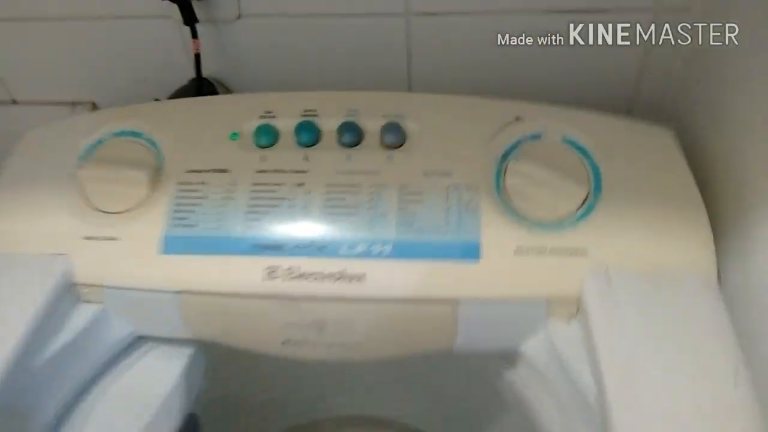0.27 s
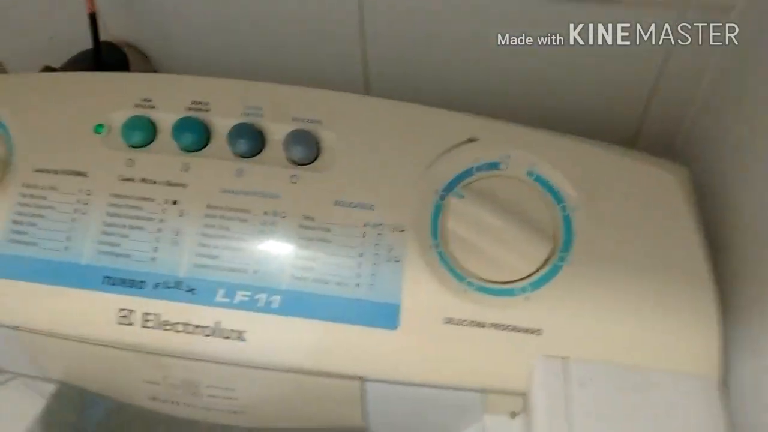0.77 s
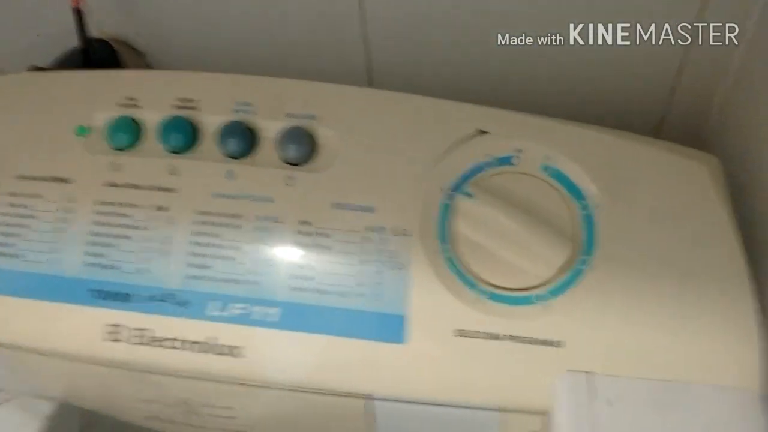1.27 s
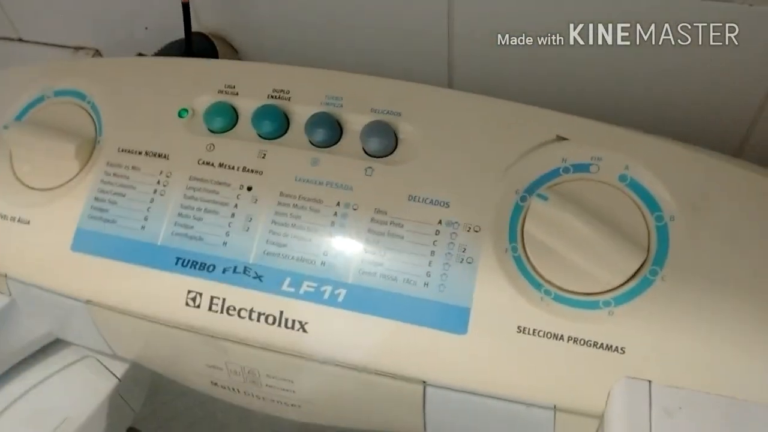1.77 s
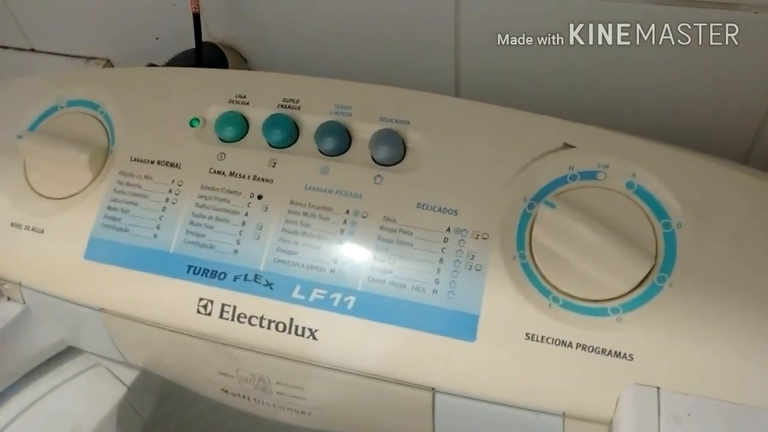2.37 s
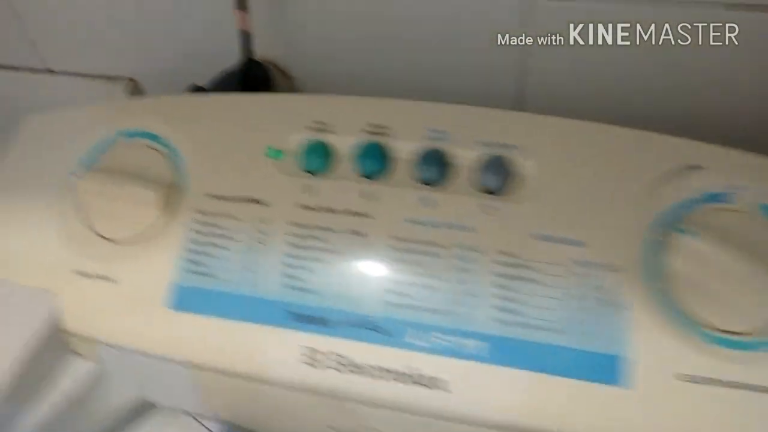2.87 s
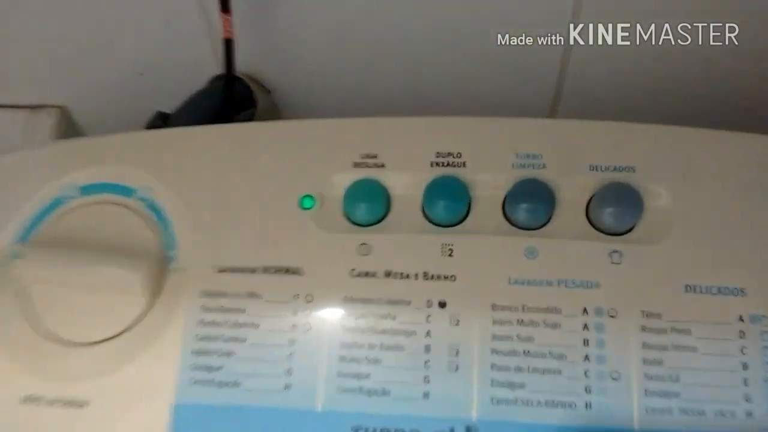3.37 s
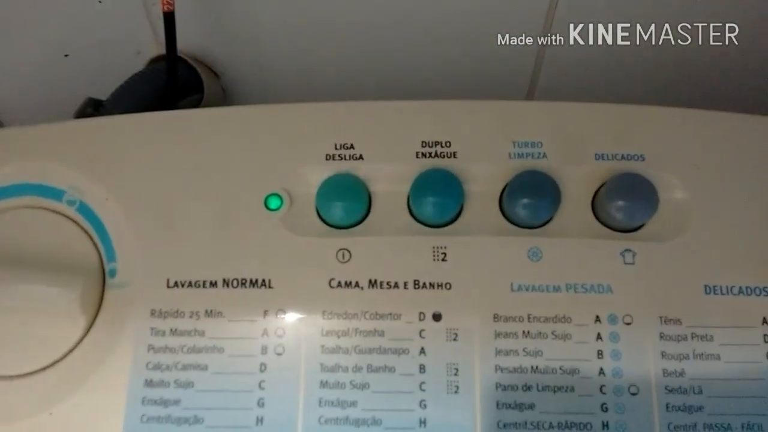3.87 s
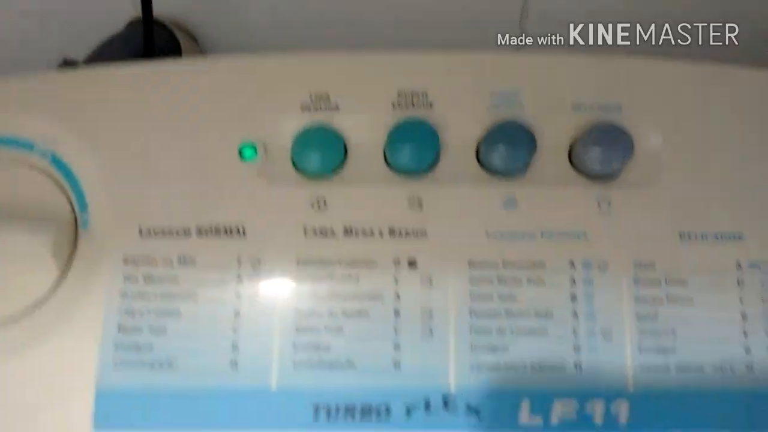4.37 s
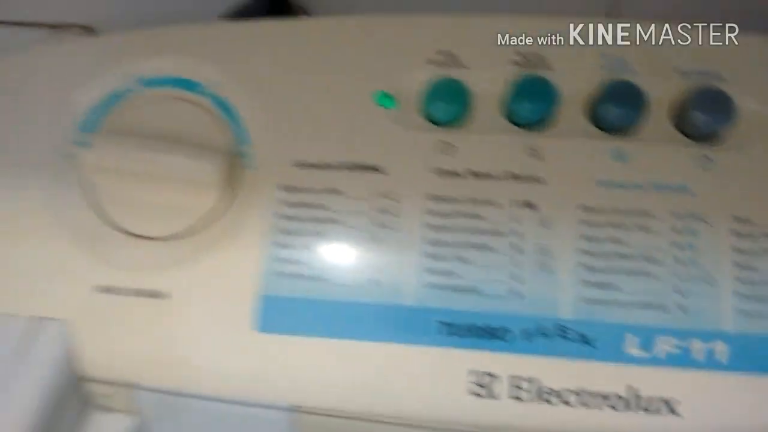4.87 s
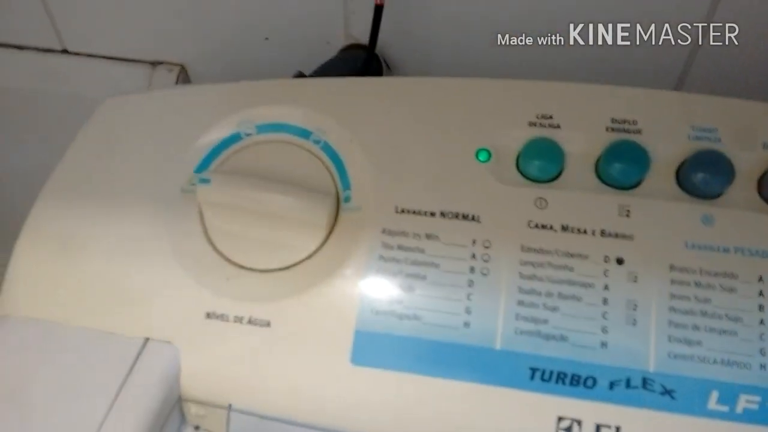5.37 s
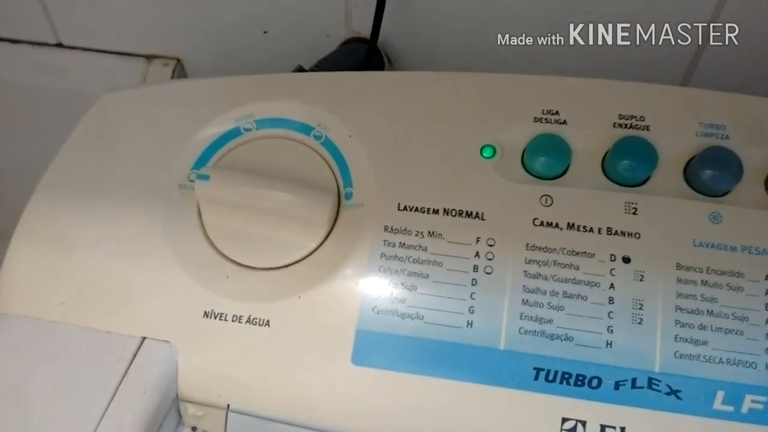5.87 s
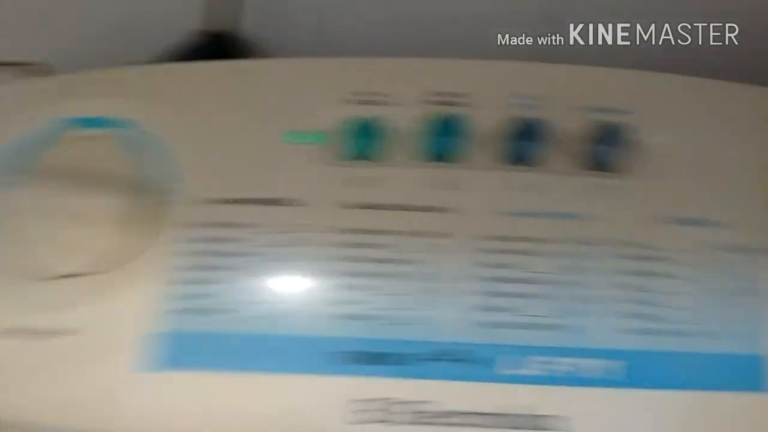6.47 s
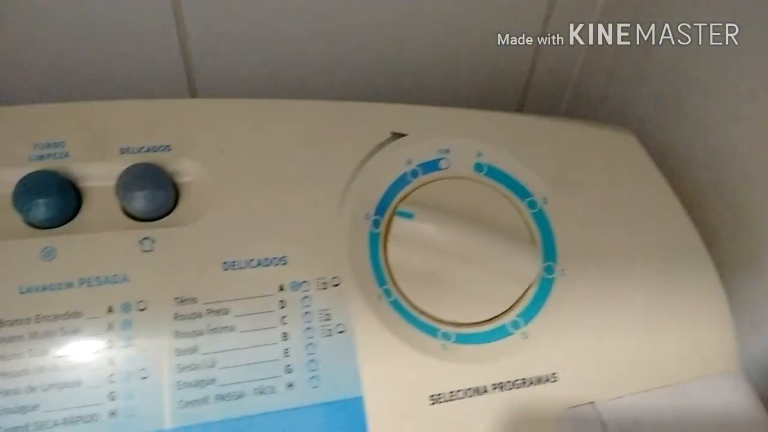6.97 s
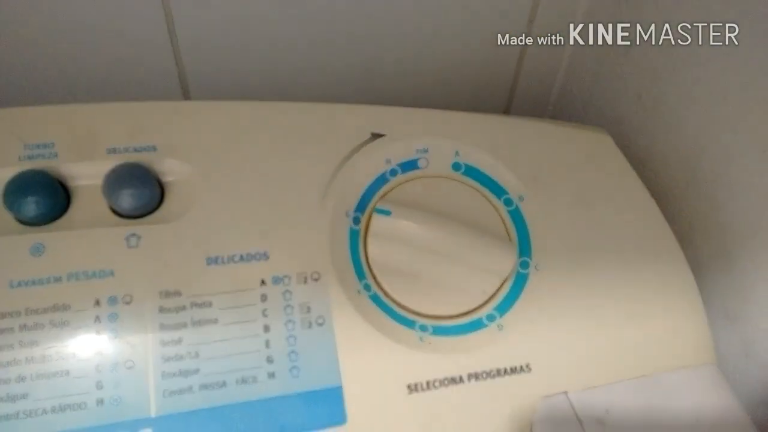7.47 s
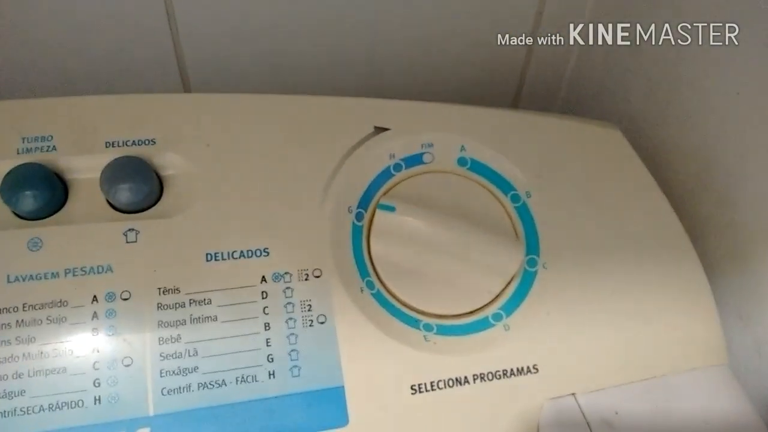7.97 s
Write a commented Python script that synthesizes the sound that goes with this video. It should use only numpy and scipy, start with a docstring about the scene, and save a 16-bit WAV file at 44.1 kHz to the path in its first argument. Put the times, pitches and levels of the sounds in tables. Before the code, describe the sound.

Constant low-mid washer hum with buzzing cabinet rattle and soft spray hiss, its tone shifting as the microphone moves close along the panel.

```python
"""Washing machine on spin

A top-loading machine spins steadily in a small tiled room, heard by a hand-held pair of microphones.
Hum is a sum of mains harmonics, knocks excite wall modes once a cycle, and whir and spray are shaped noise.
Resonators driven by noise give the air spaces, room modes, booms and sizzles; echoes comb the spray.
As the microphones move along the panel, tones and resonances swell and shift; ticks and hiss lie on top."""
import sys
import numpy as np
from scipy import signal
from scipy.fft import rfft, irfft
from scipy.io import wavfile

SR = 44100
rng = np.random.default_rng(int(sys.argv[2]) if len(sys.argv) > 2 else 0)


def pcm_store(signal):
    """Save signal as 16-bit PCM."""
    levels = np.round(np.clip(np.atleast_2d(signal), -1, 1) * 32767)
    wavfile.write(sys.argv[1], SR, levels.astype(np.int16).T)


N = 362502
T = np.arange(N) / SR  # s
HZ = np.fft.rfftfreq(N, 1 / SR)
MAINS_HZ = 59.98


def amp(db):
    """Decibel law: a level in dB becomes an amplitude ratio."""
    return 10 ** (np.asarray(db) / 20)


def unit(x):
    """Normalization: scales a signal to rms 1."""
    return x / np.sqrt(np.mean(x ** 2) + 1e-20)


def colour(rows, axis=1):
    """Spectral envelope: one column of a table, interpolated over log frequency."""
    rows = np.asarray(rows)
    return np.interp(np.log(HZ + 1), np.log(rows[:, 0] + 1), rows[:, axis])


def drift(rate_hz):
    """Low-pass random modulation of rms 1, weakening above rate_hz."""
    size = 2048
    hz = np.fft.rfftfreq(size, T[-1] / size)
    lowpass = 1 / np.sqrt(1 + (hz / rate_hz) ** 4)
    slow = irfft(rfft(rng.standard_normal(size)) * lowpass)
    return np.interp(T, np.linspace(0, T[-1], size), unit(slow))


def bump(s, length):
    """Gaussian envelope of height 1 centred on s."""
    return np.exp(-(2 * (T - s) / length) ** 2)


def swells(rows):
    """Superposed Gaussian changes of level, in dB at every sample."""
    return sum(db * bump(s, length) for s, db, length in rows)


# the two microphones: (f/Hz, likeness 0-1, left minus right/dB, left leads beyond its delay/rad)
MICROPHONES = [(45, 0.3, 5.5, 0.2), (128, 0.25, 0.5, 1.12), (182, 0.6, -2.5, -0.2), (218, 1, 5, -0.77),
               (259, 0.65, 5.5, 0.024), (306, 0.7, 18, 0.62), (350, .9, 7, -0.09), (408, 0.7, 5, -0.47),
               (483, 0.62, 2, 0.65), (587, 0.98, 2.5, 0.16), (754, 0.74, -2, -0.23), (900, 0.74, 0.5, 0.41),
               (1110, 1, 0.5, 0), (1500, 0.7, -2.5, 0.066), (1700, 0.72, -3, -0.31),
               (1900, 0.69, -1.5, -0.52), (2280, 0.87, -1, -0.33), (2570, 0.7, -1.5, -0.19),
               (2700, 0.73, -1.5, 0.2), (3000, 0.36, -1, -0.74), (3300, .78, -3, -1),
               (3700, 0.74, -1.5, 0.17), (4050, 0, -1, -0.55), (4350, 0.5, -4.5, -1.1), (4650, 0.57, 1, 0),
               (5570, 0.3, -0.5, 0.21), (7470, 0.99, -1.5, -0.12)]


def airborne(shape_db, strength=1, lag=0.0004004, knee_hz=1100):
    """Interaural coherence: coloured noise shared in part, its left side delayed by lag s above the knee."""
    shared, separate = rfft(rng.standard_normal((2, N)) * strength)
    likeness = np.clip(colour(MICROPHONES), 0, 1)
    tilt_db = colour(MICROPHONES, axis=2)
    lead = colour(MICROPHONES, axis=3) - 2 * np.pi * lag * np.maximum(HZ - knee_hz, 0)
    left = shared * np.exp(1j * lead) * amp(tilt_db / 2)
    right = (likeness * shared + np.sqrt(1 - likeness ** 2) * separate) * amp(-tilt_db / 2)
    return unit(irfft(np.array([left, right]) * amp(shape_db), N))


def resonate(x, hz, width_hz):
    """Resonance: a damped pole tracks the curve hz, applied twice for steep skirts; output rms 1."""
    turn = np.exp(2j * np.pi * np.cumsum(hz) / SR)
    r = np.exp(-np.pi * width_hz / SR)
    baseband = signal.lfilter([1], [1, -2 * r, r * r], x / turn)
    return unit((turn * baseband).real)


def shaking(depth, order=1):
    """Amplitude modulation: the motor presses loose parts together in step with the mains."""
    return np.exp(depth * np.cos(2 * np.pi * order * MAINS_HZ * T))


def bursts(rows, gust_db):
    """Transient resonance: gusty noise in one resonator per row, under a Gaussian envelope."""
    drive = airborne(0, amp(gust_db * drift(10.0)))
    out = np.zeros((2, N))
    for s, hz, width_hz, db, length in rows:
        near = abs(T - s) < 2 * length
        ringing = resonate(drive[:, near], np.full(near.sum(), hz), width_hz)
        out[:, near] += ringing * amp(db) * bump(s, length)[near]
    return out


# five resting places, each hearing the air spaces at its own pitch:
# (arrives t/s, leaves t/s, place along the panel -1 left to 1 right,
#  nearness level/dB before each source's weighting, left minus right/dB,
#  tub f/Hz, tub level/dB, level of its deeper mode/dB, lid f/Hz, gap f/Hz, gap level/dB,
#  offset of each gap mode from the gap's centre f/Hz, panel level/dB)
STOPS = [(0, 0.248, -0.78, -1.5, 1.6, 779, -42.5, -43, 1110, 1554, -50.5, 28, -47.5),
         (0.78, 2.653, 0.47, -0.12, -2, 783, -40, -38.5, 1216, 1543, -45.5, 4.9, -58),
         (3.343, 4.32, -0.21, 0.5, -2, 803, -42, -44, 1110, 1637, -44, 42, -48),
         (4.754, 6.402, -0.63, 0, -1.1, 837, -41, -47, 1095, 1615, -49, 44, -43.5),
         (6.863, 8.22, 0.92, 1, -1, 803, -45, -49, 1143, 1565, -44, 23, -44.5)]


def microphone_path():
    """Piecewise-linear motion: the stops' columns at every sample, held at rest and gliding between."""
    stops = np.asarray(STOPS)
    times = stops[:, :2].ravel()
    return [np.interp(T, times, np.repeat(column, 2)) for column in stops.T[2:]]


# brief dips and swells of the sixth harmonic: (t/s, change of level/dB, length t/s)
DRONE_LURCHES = [(2.57, -5, 0.042), (3.55, 3, 0.087), (3.77, -9, .03), (3.83, 5.5, 0.049),
                 (4.16, -9, 0.074), (4.66, 3.5, 0.14), (5.65, -4.5, 0.14), (6.28, -6, 0.031),
                 (8.04, -9, 0.05)]
# motor hum, each harmonic standing in the room; a negative fall marks a node:
# (multiple of the mains, level/dB at its place, left minus right/dB, its change per unit of place/dB,
#  left leads/rad, its place on the panel's scale, fall/dB per unit of distance from it)
HUM = [(2, -51.5, 0.5, 0, 1.1, 0.26, 10), (3, -53.5, -10, -1, 0.49, 0.3, 10.5),
       (4, -44.5, -6.5, 6, -0.54, 0.17, -2.5), (5, -36, 2, -3, 1.2, 0.56, 6),
       (6, -31.5, 0, 3.5, 0, 0.35, -1.5), (7, -40.5, -11, -0.5, -0.18, -1.1, 3),
       (8, -38, 6, -4, 0.64, 0.7, 4.5), (9, -47.5, -3, 5, 0, 0.82, 2), (10, -38.5, -4.5, 1, 0, 0.23, 4),
       (11, -43.5, -8.5, -3, -0.43, -0.55, 7), (12, -42.5, 4, -3, 0.2, 0.46, 5.5),
       (13, -45.5, -10, -4, 0.28, 0.51, 7), (14, -43.5, 5, 4, -0.37, -0.94, 8.5),
       (15, -49, -5, -11, -0.15, -1.3, 4), (16, -65, 1, -2, 0, 0.00063, -12)]


def hum(place, near_db, slip_hz=3.6, beat=0.14, fade_db=0.5, jitter=0.12, scatter=1.8, nearness=1.9,
        drone_flutter_db=0.7, flutter_db=1.36, waver=0.11):
    """Magnetic forcing: mains harmonics beat with the slipping rotor; the cabinet drones on the sixth."""
    drone = amp(swells(DRONE_LURCHES) + drone_flutter_db * drift(22.0))
    out = np.zeros((2, N))
    side = np.array([[.5], [-.5]])
    for k, db, tilt_db, swing_db, lead, own_place, fall_db in HUM:
        standing = amp(db - fall_db * abs(place - own_place) + nearness * near_db)
        if k == 6:
            swell = drone
        else:
            # higher harmonics fade more
            fading = amp(fade_db * k / 10 * drift(0.74) + flutter_db * drift(21.0))
            beating = 1 + beat * np.sin(2 * np.pi * (slip_hz * T + rng.random()))
            swell = unit(beating * fading)
        # and their phase wanders more
        wander = (waver + jitter * (k / 10) ** 2) * drift(11.0)
        phase = 2 * np.pi * k * MAINS_HZ * T + scatter * rng.standard_normal() + wander
        balance = amp(side * (tilt_db + swing_db * place))
        out += balance * np.sqrt(2) * standing * swell * np.cos(phase + side * lead)
    return out


# broad colour of the whir: (f/Hz, relative level/dB per Hz)
WHIR_COLOUR = [(20, -38), (60, -21.5), (100, -10.5), (150, -15), (250, -10.5), (380, -3), (580, 0.5),
               (780, -8), (930, -10.5), (1300, -15.5), (1800, -14), (2500, -23.5), (4200, -36), (8000, -45)]
# cabinet modes that lift the whir, and hollows between them: (f/Hz, width f/Hz, lift/dB)
CABINET_MODES = [(117.8, 4.7, 11.5), (194, 12.3, 14.5), (266, 19, 4), (325, 20, 0), (350, 15.6, 8.5),
                 (382, 22, -0.5), (436, 16, 3), (473, 14, -4), (533, 26, -2), (643, 20, -3), (753, 7.3, 6),
                 (940, 29, -1.5), (1078, 16, 6), (1386, 50, -2), (1790, 33, -7), (2060, 66, 5.5),
                 (2180, 40, -6), (2240, 63, 8)]


def whir(near_db, level_db=-33.5, nearness=0.33, rattle=0.17, flutter_db=1.88,
         wobble_hz=25.84, wobble=0.11):
    """Modulated noise: bearings and belt, chopped at mains rate and twice a basket turn, ring the cabinet."""
    lift_db = sum(db / (1 + (2 * (HZ - hz) / width) ** 2) for hz, width, db in CABINET_MODES)
    turning = 1 + wobble * np.sin(2 * np.pi * wobble_hz * T)
    strength = shaking(rattle) * turning * amp(flutter_db * drift(8.0))
    return airborne(colour(WHIR_COLOUR) + lift_db, strength) * amp(level_db + nearness * near_db)


# trim that thins the rumble below its mode: (f/Hz, relative level/dB)
RUMBLE_CUT = [(28, -12), (41, 9)]


def rumble(place, near_db, hz=48, width_hz=13, level_db=-54.0, left_db=2.0):
    """Rigid-body mode: the cabinet rocks on its feet at one low resonance, strongest on its left side."""
    mode_db = -10 * np.log10(1 + (2 * (HZ - hz) / width_hz) ** 2)
    treble_cut_db = -20 * np.log10(1 + (HZ / 150) ** 2)
    shape_db = mode_db + treble_cut_db + colour(RUMBLE_CUT)
    return airborne(shape_db) * amp(level_db + near_db - left_db * place)


def whine(hz=4807, width_hz=14, level_db=-63.5, left=0.45):
    """Narrow-band noise: a faint motor whistle, in opposite phase at the two microphones."""
    whistle = resonate(rng.standard_normal(N), np.full(N, hz), width_hz)
    return whistle * amp(level_db) * np.array([[-left], [1]])


# steady hiss of each microphone: (f/Hz, left relative level/dB per Hz, right relative level/dB per Hz)
HISS = [(100, 2, 9), (4900, -25, 0), (7340, -13, -17), (8860, -1.5, -2.5), (9700, -5, 1), (11000, -8, 0.5),
        (12000, -4.5, 3.5), (14000, -10, 2), (15500, -19, 2)]


def hiss(level_db=-52.5, flicker_db=1.14):
    """Self-noise: uncorrelated hiss in each microphone, brighter on the right, flickering a little."""
    shape = amp([colour(HISS), colour(HISS, axis=2)])
    noise = unit(irfft(rfft(rng.standard_normal((2, N))) * shape, N))
    return noise * amp(level_db + flicker_db * drift(16))


# swells of the gap's ring: (t/s, change of level/dB, length t/s)
GAP_FLARES = [(3.0, 3.5, 0.23), (8.15, 5, 0.22)]
# lid, gap and panel swell as the tub recedes by as much: (t/s, change of level/dB, length t/s)
SWEEPS = [(.45, 5, 0.33), (3.02, 2, 0.54), (4.7, 3, 0.35), (6.8, 1, 0.33)]


def hollows(place, tub_hz, tub_db, deep_db, lid_hz, gap_hz, gap_db, split_hz, panel_db, waver_hz=12,
            tub_width_hz=38, deep_ratio=.92, lid_db=-51.0, lid_right_db=3.0, lid_width_hz=65,
            gap_width_hz=62, panel_hz=1455, panel_width_hz=65, tub_rattle=0.079, gap_rattle=0.18,
            flutter_db=2.5):
    """Cavity resonance: whir in the open tub, under the raised lid, in the panel and the gap behind it."""
    churn = airborne(0, shaking(tub_rattle))
    tub = resonate(churn, tub_hz, tub_width_hz) * amp(tub_db)
    tub += resonate(churn, deep_ratio * tub_hz, tub_width_hz) * amp(deep_db)
    drive = airborne(0, amp(flutter_db * drift(7.9)))
    lid = resonate(drive, lid_hz, lid_width_hz) * amp(lid_db + lid_right_db * place)
    centre_hz = gap_hz + waver_hz * drift(4.1)
    lower = resonate(drive, centre_hz - split_hz, gap_width_hz)
    upper = resonate(churn, centre_hz + split_hz, gap_width_hz)
    gap = unit(lower + upper) * amp(gap_db + swells(GAP_FLARES))
    panel = resonate(drive, np.full(N, panel_hz), panel_width_hz) * amp(panel_db)
    sweep = amp(swells(SWEEPS))
    return tub / sweep + (lid + gap + panel) * sweep * unit(shaking(gap_rattle, order=2))


# colour of the spray: (f/Hz, relative level/dB per Hz)
SPRAY_COLOUR = [(1500, -16), (2400, -2.5), (3000, -1.5), (3600, 1), (4100, -0.5), (4700, -6.5),
                (6300, -11.5), (8000, -14.5), (15000, -43)]


def spray(near_db, level_db=-47.5, nearness=0.84, gust_db=1.53, patch_db=2.5, patch_width_hz=150, count=10):
    """Turbulent noise: water leaves the basket in gusts, each patch of tub wall hissing at its own pitch."""
    water = airborne(colour(SPRAY_COLOUR), amp(gust_db * drift(11)))
    spectrum = rfft(water)
    out = water
    for hz in np.linspace(2800, 4100, count):
        patch = irfft(spectrum * np.exp(-(2 * (HZ - hz) / patch_width_hz) ** 2), N)
        out = out + patch * (amp(patch_db * drift(2.2)) - 1)
    return unit(out) * amp(level_db + nearness * near_db)


def tiles(x, place, echo_db=-5.5, first_s=.003, last_s=.016, shift_s=0.000483, count=8):
    """Comb filtering: echoes off tiled walls, their delays sliding as the microphones move."""
    delays = rng.uniform(first_s, last_s, count)
    slopes = rng.uniform(-0.89, 1, count)
    signs = rng.choice([-1, 1], count)
    out = x.copy()
    for delay, slope, sign in zip(delays, slopes, signs):
        heard = T - delay - shift_s * slope * place
        echo = np.array([np.interp(heard, T, side) for side in x])
        out += sign * amp(echo_db) / np.sqrt(count) * echo
    return out / np.sqrt(1 + amp(echo_db) ** 2)


# standing waves between the machine and the tiled walls; a negative fall marks a node:
# (f/Hz, width f/Hz, level/dB at its place, that place -1 to 1, fall/dB per unit of distance from it)
ROOM_MODES = [(118.3, 6.6, -52.5, 0.31, 9), (265.6, 17, -53.5, 0.092, -13.5), (451, 29, -45.5, -0.32, -1),
              (507, 22, -46, -.1, -1), (571.7, 30, -43.5, -.2, -0.5), (681.5, 17, -48, 0.075, -3),
              (746.5, 26, -53, -0.14, -1), (803, 20, -53, 1, 2.5), (837, 26, -55, -0.041, -5),
              (1005, 39, -53.5, .3, 3), (1298, 52, -58.5, -0.14, -5), (1829, 49, -53.5, -0.57, 6),
              (1894, 40, -59, -0.74, 10)]


def room(place, near_db, rattle=0.1, nearness=0.44):
    """Room modes: the shaking cabinet feeds narrow standing waves that the microphones drift through."""
    drive = airborne(0, shaking(rattle))
    out = np.zeros((2, N))
    for hz, width_hz, db, own_place, fall_db in ROOM_MODES:
        level_db = db - fall_db * abs(place - own_place) + nearness * near_db
        out += resonate(drive, np.full(N, hz), width_hz) * amp(level_db)
    return out


# brief ring of the loose cabinet wall: (f/Hz, relative level/dB, t60 t/s)
WALL_MODES = [(450, -7.5, .018), (539, 14, 0.014), (627, -4, 0.0093)]
# bouts of harder or softer rattling: (t/s, change of level/dB, length t/s)
RATTLES = [(1.0, 7, .08), (1.55, 5, 0.063), (1.7, 8, 0.038), (1.81, 7, 0.036), (1.93, 5, .04),
           (3.02, -6, 0.047), (3.24, 5, 0.029), (5.76, 5, 0.037), (7.26, 8, 0.075), (7.44, 9.5, 0.074)]


def knocks(near_db, level_db=-40.5, uneven_db=2, surge_db=1.5, jitter_s=0.00041):
    """Impulse response: uneven blows, one a mains cycle, ring the modes of a loose cabinet wall."""
    beats = np.arange(1, int(T[-1] * MAINS_HZ))
    late, size, way = rng.standard_normal((len(beats), 3)).T
    at = np.clip((beats / MAINS_HZ + jitter_s * late) * SR, 0, N - 1).astype(int)
    blows = np.zeros(N)
    blows[at] = np.sign(way) * amp(uneven_db * np.minimum(size, 1.5))
    t = T[T < .06]
    ring = sum(amp(db - 60 * t / t60) * np.sin(2 * np.pi * hz * t) for hz, db, t60 in WALL_MODES)
    rung = signal.oaconvolve(blows * amp(surge_db * drift(13)), ring)[:N]
    band = signal.butter(4, [410, 850], "bandpass", fs=SR, output="sos")
    return unit(signal.sosfilt(band, rung)) * amp(level_db + near_db + swells(RATTLES))


# ticks and scuffs of the holding hand: (t/s, level/dB before the left cut, hold t/s, fade t/s)
TICKS = [(0.03, -55, 0.25, 0.027), (2.223, -50, .015, .015), (2.899, -51, .012, .025),
         (3.14, -50, .014, 0.018), (3.185, -56, .01, .008), (3.236, -53, .008, .01), (4.192, -51, .01, .01),
         (4.496, -52, .012, .008), (4.568, -54, 0.06, .06), (4.96, -51, 0.028, .02),
         (5.751, -47, .004, .005), (5.761, -49, .01, .012), (6.18, -52, .008, .01), (7.197, -51, .01, .012),
         (7.227, -51, .022, .015)]
# their colour: (f/Hz, relative level/dB per Hz)
TICK_COLOUR = [(1500, -30), (5000, -6), (9000, -2), (12500, 0), (14500, 0), (16000, -8)]


def ticks(attack_s=.002, left_db=-5):
    """Friction noise: fingers shifting on the microphone housing tick and scuff, louder on the right."""
    level = np.zeros(N)
    for s, db, hold, fade in TICKS:
        rise = np.clip((T - s) / attack_s, 0, 1)
        level += amp(db) * rise * np.exp(-np.maximum(T - s - hold, 0) / fade)
    return airborne(colour(TICK_COLOUR)) * level * amp([[left_db], [0]])


# single resonances that ring out: (centre t/s, f/Hz, width f/Hz, level/dB, length t/s)
BOOMS = [(.2, 940, 140, -46, .6), (.55, 198, 18, -44.5, .35), (.9, 579, 47, -38, 0.63),
         (.97, 507, 22, -38, .35), (3.02, 507, 18, -38, 0.18), (3.33, 1432, 47, -45, .3),
         (4.62, 1110, 44, -42, 0.22), (4.3, 1720, 150, -48, .8), (5.7, 868, 28, -42.5, 1.2),
         (6.02, 1445, 45, -43.5, 0.39), (6.1, 1800, 160, -50, .8), (6.5, 507, 20, -42, 0.37),
         (6.76, 1430, 54, -45, 0.39), (6.85, 570, 26, -40.5, .4), (7.27, 451, 20, -38, 0.5),
         (8.1, 805, 30, -38, .35)]


def booms():
    """Modal excitation: now and then one resonance of the cabinet swells and dies away."""
    return bursts(BOOMS, gust_db=2.5)


# sheets of spray striking the tub: (centre t/s, f/Hz, width f/Hz, level/dB, length t/s)
SIZZLES = [(0.732, 3600, 1290, -51, 0.049), (2.02, 3600, 450, -51, 0.49), (2.75, 3150, 700, -55.5, 0.8),
           (3.6, 3500, 800, -52.5, 1), (4.647, 3780, 700, -50, 0.5), (5.04, 3450, 350, -50, 0.31),
           (5.775, 3200, 2200, -46, 0.04), (6.1, 3300, 900, -54.5, 0.65), (6.65, 3140, 544, -49.5, 0.5),
           (6.98, 3670, 400, -48.5, 0.39), (7.212, 3700, 400, -46, 0.085), (7.848, 3900, 605, -49, 0.16)]


def sizzles():
    """Impact noise: spray strikes the tub in passing bands of noise."""
    return bursts(SIZZLES, gust_db=2.1)


def scene():
    """Superposition: all parts of the machine, with a level balance that turns along the path."""
    place, near_db, turn_db, *air_spaces = microphone_path()
    sides = amp(np.array([[1], [-1]]) * turn_db / 2)
    turned = hum(place, near_db) + whir(near_db) + knocks(near_db) + room(place, near_db) + booms()
    machine = turned * sides + rumble(place, near_db) + whine()
    water = tiles(spray(near_db) + sizzles(), place)
    return machine + hollows(place, *air_spaces) + water + ticks() + hiss()


EDGE_HZ = 15530


def record(dry):
    """Band limiting: a steep linear-phase low-pass at EDGE_HZ."""
    lowpass = signal.firwin(1023, EDGE_HZ, window=("kaiser", 9), fs=SR)
    return signal.oaconvolve(dry, lowpass[None], "same")


dry = scene()
out = record(dry)
pcm_store(out)
```